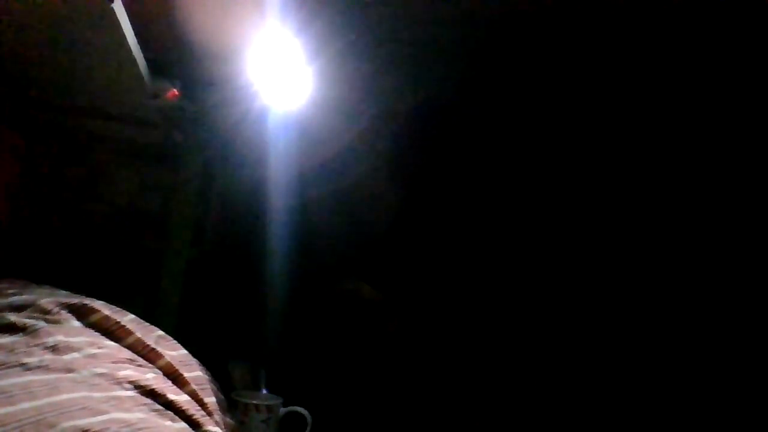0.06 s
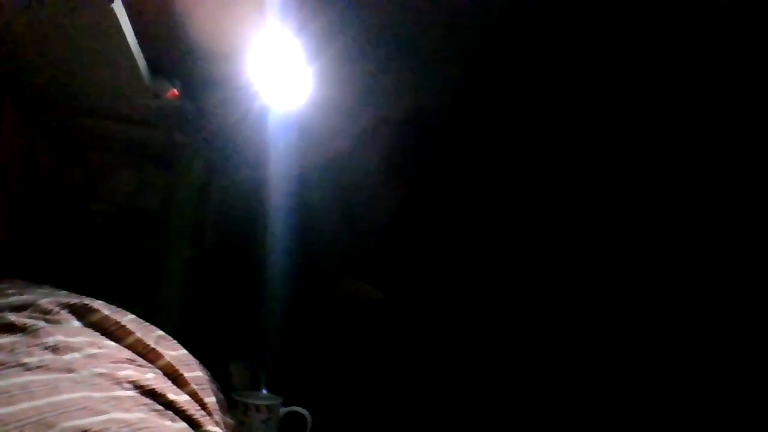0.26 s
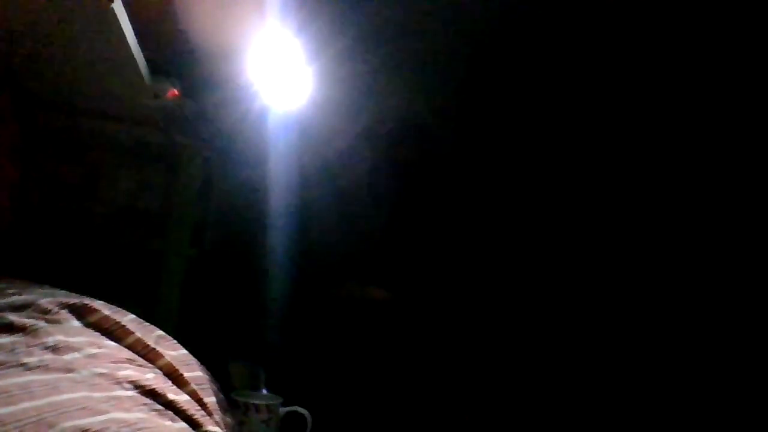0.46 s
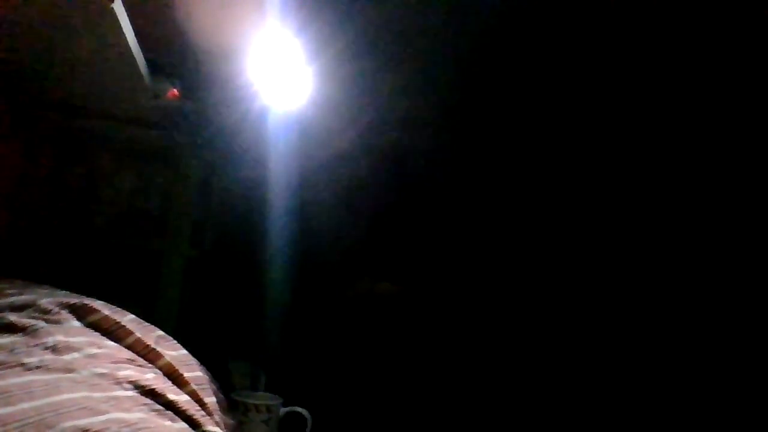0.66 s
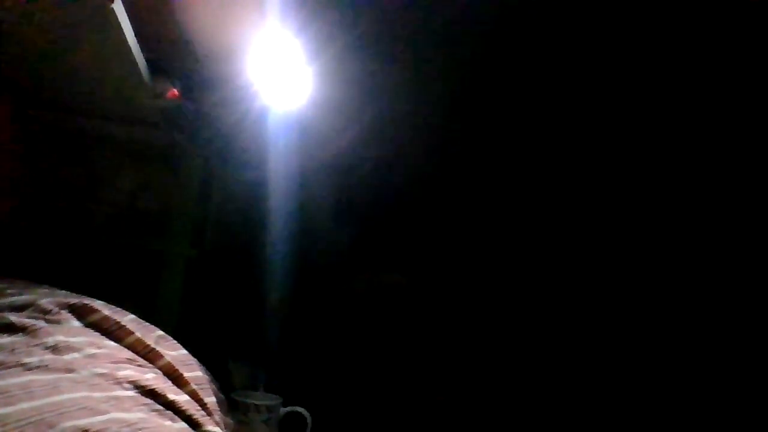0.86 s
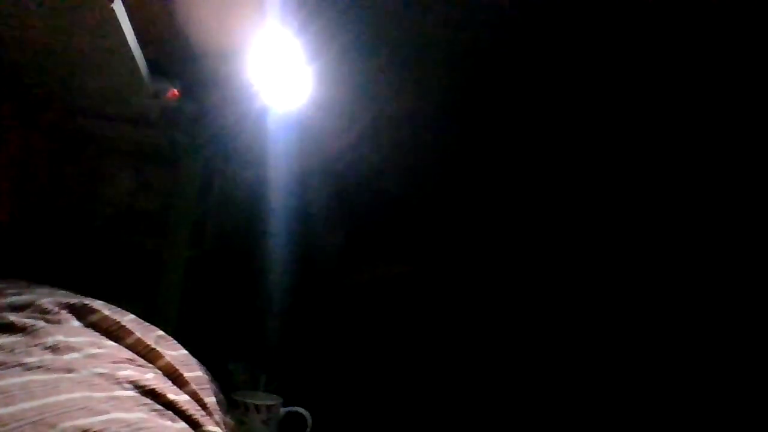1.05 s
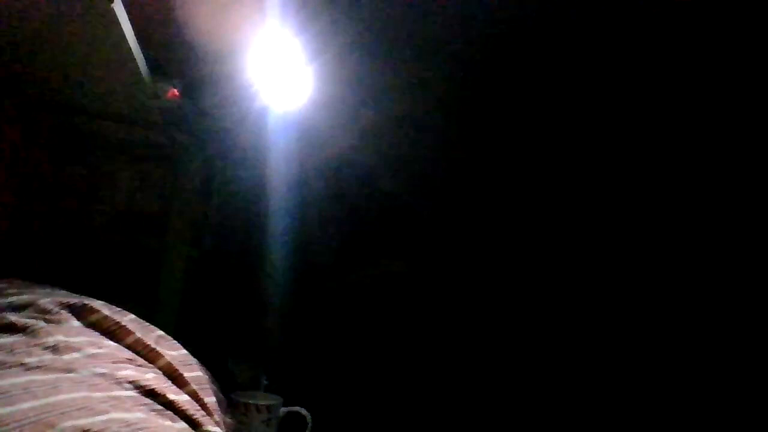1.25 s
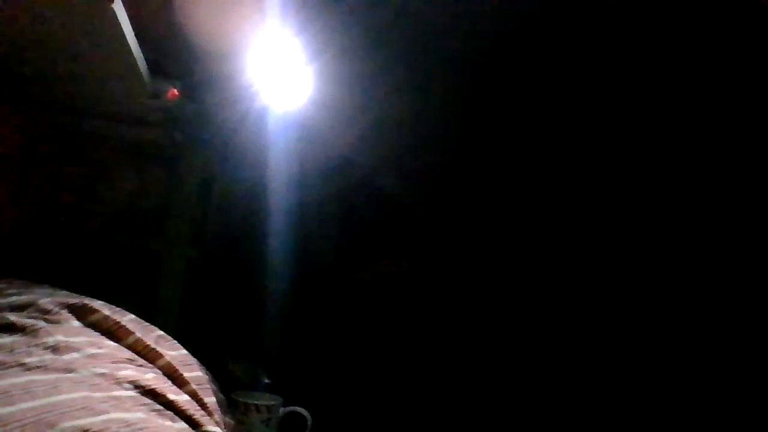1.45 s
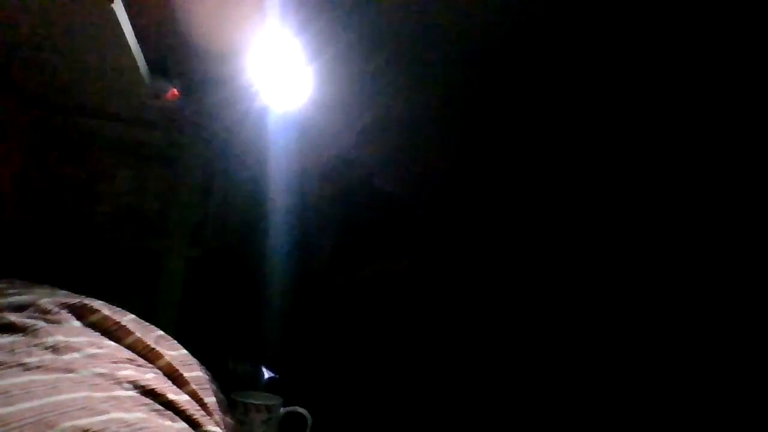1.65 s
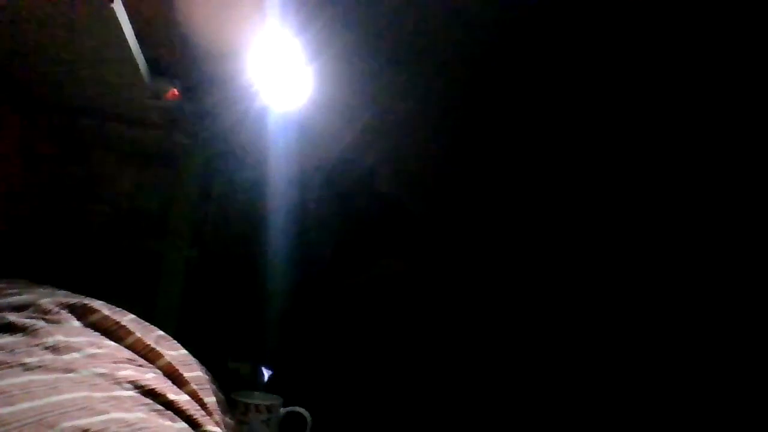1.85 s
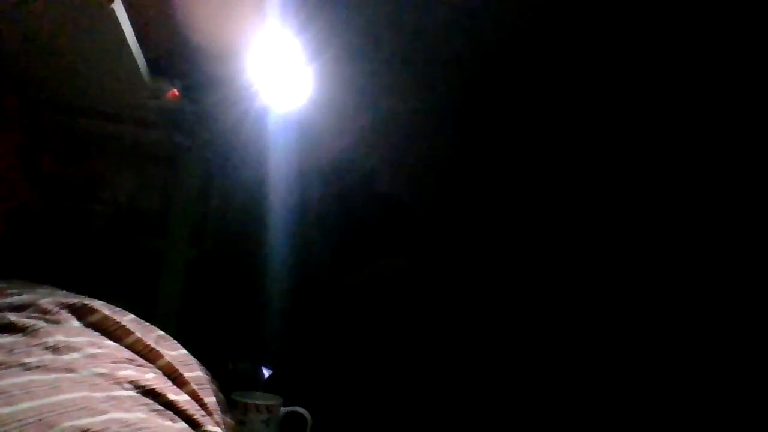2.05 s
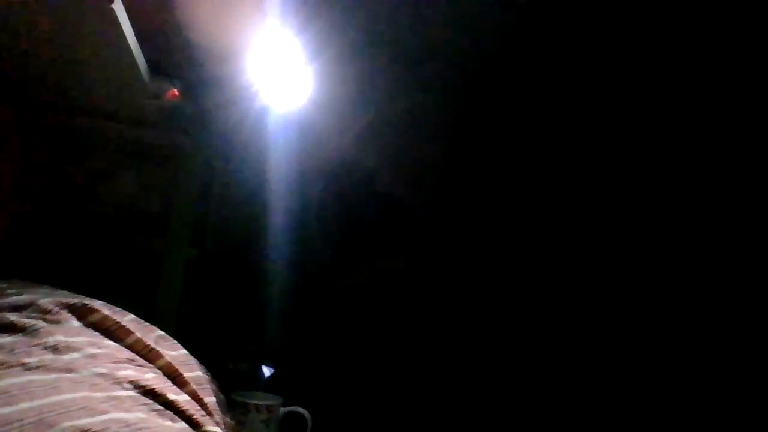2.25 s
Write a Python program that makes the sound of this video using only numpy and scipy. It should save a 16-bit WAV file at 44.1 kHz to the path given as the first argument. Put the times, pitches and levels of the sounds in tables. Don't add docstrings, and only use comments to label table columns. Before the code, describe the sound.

Something wooden is knocked about indoors, one hard crack first, then deep thuds and light latch-like clatter, fading to quiet; fabric rustles and low rumble come from a closely held stereo microphone.

```python
import sys
import numpy as np
from scipy import signal
from scipy.fft import rfft, irfft
from scipy.io import wavfile
from scipy.ndimage import uniform_filter1d

SR = 44100
rng = np.random.default_rng(int(sys.argv[2]) if len(sys.argv) > 2 else 0)


def dump_mix(stems):
    frames = np.atleast_2d(stems).T
    limited = np.clip(frames, -1, 1)
    pcm = np.round(limited * 32767).astype(np.int16)
    wavfile.write(sys.argv[1], SR, pcm)


def boost_factor(decibels):
    exponent = np.asarray(decibels, float) / 20
    return 10 ** exponent


N = 99225


def evened(x):
    return x / np.sqrt(np.mean(x ** 2) + 1e-20)


def read(points, hz):
    f, value = np.transpose(points)
    return np.interp(np.log(hz + 1), np.log(f + 1), value)


def along(curve):
    return boost_factor(np.interp(np.arange(N) / SR, *np.transpose(curve)))


def coloured(x, points):
    hz = np.fft.rfftfreq(len(x), 1 / SR)
    inside = (hz >= points[0][0]) & (hz <= points[-1][0])
    return evened(irfft(rfft(x) * boost_factor(read(points, hz)) * inside, len(x)))


def contact(t, length, rise_s, let_go_s):
    return np.clip(t / rise_s, 0, 1) * np.exp(-np.maximum(t - length, 0) / let_go_s)


def octave_bell(hz, centre, reach):
    return -6 * ((np.log2(hz / 1000) - centre) / reach) ** 2


def handling():
    # time_s, level_db
    effort = [(0, -29.5), (.28, -25.5), (.45, -25), (.55, -27.5), (.69, -35), (.9, -30), (1.0, -31),
              (1.3, -31), (1.43, -24), (1.6, -28.5), (1.72, -21), (1.82, -30), (2.05, -29.5), (2.25, -41)]
    # frequency_hz, density_db
    rumble_colour = [(6, -7), (15, 7.5), (30, -9.5), (58, -3.5), (80, -26), (110, -29), (160, -74)]
    # frequency_hz, density_db
    air_colour = [(60, 23.5), (100, 16), (200, 7.5), (400, -3.5), (1500, -4.5), (4000, -23.5), (16000, -45)]
    lumps = evened(uniform_filter1d(rng.standard_normal(N), size=1500))
    low = coloured(rng.standard_normal(N) * boost_factor(3.2 * lumps), rumble_colour)
    air = coloured(rng.standard_normal(N), air_colour)
    return along(effort) * low + boost_factor(-41.5) * air


def cloth():
    # time_s, level_db
    rustle = [(0, -29), (.09, -32.5), (.2, -29.5), (.28, -43.5), (.36, -33.5), (.46, -37), (.58, -29.5),
              (.74, -34), (.86, -36), (.9, -42.5), (1.12, -44), (1.18, -42.5), (1.27, -45), (1.42, -40.5),
              (1.6, -47), (1.75, -38), (2.08, -41.5), (2.25, -42.5)]
    # start_s, level_db, length_s
    brisk_rubs = [
        (0.136, -46, 0.02),
        (0.361, -35, 0.064),
        (0.645, -29.5, 0.06),
        (1.28, -33, 0.087),
        (1.428, -38.5, 0.11),
        (1.625, -31.5, 0.056),
        (1.871, -24.5, 0.078),
        (2.152, -42, 0.028),
    ]
    # frequency_hz, density_db
    cloth_colour = [(150, -14), (300, -1.5), (800, -6), (2000, -2.5), (5000, -4.5), (9000, -6),
                    (14500, -0.5), (16500, 6)]
    t = np.arange(N) / SR
    flicker = evened(uniform_filter1d(rng.standard_normal(N), size=300))
    grains = rng.standard_normal(N) * boost_factor(0.5 * rng.exponential(1, N) + 0.66 * flicker)
    hiss = rng.standard_normal(N) * boost_factor(1.2 * flicker)
    bright = coloured(hiss, [(1500, -7), (6000, -17), (13000, -10.5), (16500, -2.0)])
    rubs = sum(boost_factor(level_db) * contact(t - s, length, 0.023, 0.0086) for s, level_db, length in brisk_rubs)
    return boost_factor(1.0) * along(rustle) * coloured(grains, cloth_colour) + rubs * bright


def room(x):
    # frequency_hz, t60_s
    room_decay = [(150, 0.31), (1000, 0.28), (4000, 0.25), (12000, 0.21)]
    taps = np.zeros(SR // 2)
    at = np.arange(160, len(taps) - 20, 20)
    taps[at + rng.integers(0, 20, at.shape)] = rng.choice([-1., 1.], at.shape)
    hz, t, z = signal.stft(taps, SR, nperseg=256)
    decay = boost_factor(-60 * t / read(room_decay, hz)[:, None])
    tail = signal.istft(z * decay, SR, nperseg=256)[1]
    return signal.fftconvolve(x, tail / np.linalg.norm(tail))[:N]


def strikes(rows, modes, reach, crack_reach, rise, let_go_s, grain_db, low_hz, push):
    detune, uneven_db = .015, 1.5
    longest_ring_s = .15
    size = 16384
    t, hz = np.arange(size) / SR, np.fft.rfftfreq(size, 1 / SR) + 1
    out = np.zeros(N + size)
    f, mode_db, t60 = np.array(modes).T[:, :, None]
    highpass = signal.butter(4, low_hz, "high", fs=SR, output="sos")
    for s, level_db, length, centre, crack_db in rows:
        shift, uneven = rng.standard_normal((2, len(modes), 1))
        decay = np.exp(-np.log(1000) * t / np.clip(t60, .02, longest_ring_s))
        onset = 1 - np.exp(-2 * f * t)
        rings = rfft(decay * onset * np.sin(2 * np.pi * f * (1 + detune * shift) * t))

        grains = np.repeat(np.minimum(rng.exponential(1, size // 32), 2), 32)
        shape = contact(t, length, rise * length, let_go_s) * boost_factor(grain_db * grains)
        force = rfft(rng.standard_normal(size) * shape) + push

        free = np.linalg.norm(rings, axis=1, keepdims=True)
        driven = np.linalg.norm(rings * free / free * force, axis=1, keepdims=True)
        levels = boost_factor(mode_db + uneven_db * uneven + octave_bell(f, centre, reach))
        body = (rings * free / driven * levels).sum(0)
        ring = irfft(force * body)
        colour = boost_factor(octave_bell(hz, centre, crack_reach))
        crack = irfft(rfft(rng.standard_normal(size)) * colour) * shape

        head = slice(0, int((length + .01) * SR))
        sound = ring / ring[head].std() + boost_factor(crack_db) * crack / crack[head].std()
        at = round(s * SR)
        out[at:at + size] += boost_factor(level_db) * signal.sosfilt(highpass, sound)
    return out[:N]


def furniture_thumps():
    thump_events = [(.165, -36.5, 0.042, -1, -7), (.483, -34.5, 0.03, 3, 19),
                    (.635, -33.5, 0.035, -4, -6.5), (.767, -33, 0.019, -1.37, -5),
                    (.9, -39, 0.19, -3.5, -8.5), (1.06, -54.5, 0.17, -0.5, -28),
                    (1.125, -38.5, 0.037, -2.5, -32), (1.15, -41.5, 0.15, -2.5, -30),
                    (1.322, -23.5, 0.017, -0.66, -1.5), (1.345, -23, 0.0051, -1.3, -2.5),
                    (1.376, -36.5, 0.015, -0.5, 2.5), (1.44, -35.5, 0.015, -2.2, 0.5),
                    (1.595, -37, 0.1, -1.52, -16), (1.662, -34.5, 0.022, -0.6, 1.5),
                    (1.7, -30.5, 0.01, -3, -2.5), (1.765, -38, 0.028, -1.16, 0),
                    (1.828, -35, 0.014, -1, -11), (1.87, -40, 0.15, -2, -40)]
    # frequency_hz, level_db, t60_s
    frame_modes = [(124, 0, 0.074), (158, -2.5, 0.049), (223, 3, 0.054), (255, -2.5, 0.026),
                   (367, -4.5, 0.04), (469.5, -10, 0.083), (536, -33.5, 0.048), (718.3, -11, 0.1)]
    return strikes(thump_events, frame_modes, reach=0.45, crack_reach=1.8, rise=0.26, let_go_s=0.0094,
                   grain_db=-7.0, low_hz=70.6, push=18.0)


def single_mode_blows():
    # start_s, peak_db, pitch_hz, swell_s
    blow_events = [(.133, -27.5, 3530, 0.0048), (.14, -24, 944, 0.008), (0.159, -27.5, 120, 0.0092),
                   (.77, -33.5, 447, 0.0063), (1.16, -25.5, 60.5, 0.016), (1.42, -24, 61.3, 0.018),
                   (0.4792, -10.5, 1040, .003), (.484, -13, 2770, .003), (.488, -17, 1760, 0.0067),
                   (.494, -12.5, 894, 0.0034), (.508, -27, 995, 0.0047), (0.506, -27, 216, 0.0065),
                   (.535, -20.5, 936, 0.0044), (0.662, -25, 66.5, 0.014), (0.767, -19.5, 255, 0.0042),
                   (.81, -32.5, 134, 0.0078), (1.118, -20, 165.4, 0.0068), (1.22, -31.5, 188, 0.024),
                   (1.322, -8.5, 170, 0.0026), (1.323, -18, 320, 0.0085), (1.327, -17, 2930, 0.0014),
                   (1.326, -21.5, 4900, 0.0012), (1.18, -42, 362, 0.054), (1.333, -11.5, 474, 0.0051),
                   (1.346, -16, 215, 0.0048), (1.374, -12, 160, 0.0036), (1.388, -14.5, 134, 0.0074),
                   (1.449, -26, 488, 0.0049), (1.641, -17.5, 2156, .003), (1.667, -4.5, 161, 0.0028),
                   (1.667, -24, 2110, 0.0027), (1.674, -22, 488, 0.0058), (1.676, -24, 363, 0.0061),
                   (1.686, -16.5, 132.4, 0.0088), (1.705, -20.5, 84, 0.0091), (1.711, -26.5, 208, 0.0085),
                   (1.824, -24.5, 180, 0.0046), (1.829, -12.5, 2955, 0.0019), (1.835, -19, 2885, 0.0041),
                   (1.849, -27, 2950, 0.0028), (1.873, -21, 3000, 0.0055), (1.913, -19, 1335, 0.003),
                   (1.9201, -9, 2920, 0.0022), (1.921, -13, 2040, 0.0051), (1.971, -16.5, 4970, 0.0012),
                   (1.975, -16, 4670, 0.0026), (1.997, -22.5, 1380, 0.0025)]
    t, out = np.arange(8192) / SR, np.zeros(N + 8192)
    for s, peak_db, hz, swell in blow_events:
        u, at = t / swell, round(s * SR)
        sag = 0.011 * np.minimum(u, 10) / (1 + hz / 297)
        swelling = u * np.exp(1 - u)
        out[at:at + len(t)] += boost_factor(peak_db) * swelling * np.sin(2 * np.pi * hz * t * (1 - sag))
    return out[:N]


def latch_clatter():
    click_events = [(1.439, -40, 0.0044, -0.08, 10), (1.585, -49.5, 0.006, 0.2, 7),
                    (1.636, -28.5, 0.014, 0.97, 4), (1.64, -37, 0.037, 3.5, 7.5),
                    (1.666, -34, 0.021, 0.03, 3), (1.712, -45, 0.0051, 0.5, 7.5),
                    (1.757, -35, 0.0079, 1.5, 6), (1.79, -50, 0.03, 12, -19), (1.823, -30, 0.017, 1.5, 1.5),
                    (1.829, -28.5, 0.004, 1.2, 3), (1.835, -31, 0.0081, 0, -6),
                    (1.862, -34.5, 0.042, 1.5, 2.5), (1.88, -38.5, 0.02, 7.5, 27),
                    (1.9155, -23.5, 0.0042, 1.5, 5), (1.9205, -22.5, 0.0074, 1, 3.5),
                    (1.94, -36, 0.031, 1.1, 6.5), (1.97, -33, 0.021, 1.5, 5.5),
                    (1.99, -36, 0.022, 1.5, 3.5)]
    # frequency_hz, level_db, t60_s
    latch_modes = [(864, 6, 0.042), (1375, 3, 0.039), (2130, 2.5, 0.043), (2420, -4, 0.029),
                   (2860, -1, 0.017), (2945, -1, 0.018), (3460, -13, 0.017), (4330, -2, 0.051),
                   (4626, 11.5, 0.014), (5420, -8.5, 0.026), (6620, -6, 0.02)]
    return strikes(click_events, latch_modes, reach=0.53, crack_reach=1.43, rise=0.044, let_go_s=.012,
                   grain_db=1.0, low_hz=387, push=18)


def wooden_knocks():
    # start_s, level_db, contact_s, colour_centre_octaves (re 1 kHz), crack_db
    knock_events = [
        (.097, -42.5, 0.036, 2.5, 7.5),
        (.128, -28.5, 0.034, 2.5, 1.5),
        (.205, -36.5, 0.0057, -1.5, 0.5),
        (.385, -36, 0.009, 0.5, 2),
        (.479, -14, 0.011, 1, 4),
        (.6, -38, 0.0041, 20, -8),
        (.917, -49.5, 0.0034, 2.5, 7.5),
        (.955, -53.5, 0.012, 0.06, 16.5),
        (1.322, -26, 0.0023, 0.9, 0.5),
        (2.2, -42.5, 0.02, -2, 4.5),
    ]
    # frequency_hz, level_db, t60_s
    wood_modes = [(614, 4.5, 0.046), (752, -11, 0.2), (886, 7, 0.047), (939, -4.5, 0.19),
                  (1080, -2.5, 0.11), (1790, -11, 0.081), (2078, 4.5, 0.03), (2630, 5.5, 0.036),
                  (2890, 6.5, 0.014), (3653, 1, 0.026), (4435, 2, 0.018)]
    wood = strikes(knock_events, wood_modes, reach=2.45, crack_reach=1.87, rise=0.21, let_go_s=0.019,
                   grain_db=1.5, low_hz=440, push=0)
    return signal.lfilter(*signal.iirnotch(1450, 5, SR), wood)


def two_ports(field):
    # frequency_hz, left_lead_rad
    port_lead = [(0, 0), (250, 0), (600, .03), (1100, .1), (3500, .34), (6800, .8), (12100, 1.5),
                 (16000, 2.1)]
    z, hz = rfft(field), np.fft.rfftfreq(N, 1 / SR)
    turn = np.exp(.5j * np.interp(hz, *np.transpose(port_lead)))
    taps = rng.standard_normal(2000) * np.exp(-np.arange(2000) / 500)
    treble = boost_factor(-9) / (1 + (5000 / (hz + 1)) ** 4)
    scatter = rfft(taps / np.linalg.norm(taps), N) * treble
    return irfft([z * (turn + scatter), z * (1 / turn - scatter)], N)


def scene():
    background = handling() + cloth()
    thumps, clean = furniture_thumps(), single_mode_blows()
    latch, wood = latch_clatter(), wooden_knocks()
    direct = thumps + clean + latch + wood
    reverberant = boost_factor(-8.0) * room(thumps) + boost_factor(-12.5) * room(clean)
    reverberant += boost_factor(-8) * room(latch) + boost_factor(-9) * room(wood)
    return two_ports(background + direct + reverberant)


def band_limit(x):
    return signal.sosfilt(signal.butter(12, 16340, fs=SR, output="sos"), x)


def record(dry):
    edge = signal.firwin(801, 15900, window=("kaiser", 8), fs=SR)
    mix = np.clip(signal.oaconvolve(dry, edge[None], "same"), -1, 1)
    return band_limit(mix)


dry = scene()
out = record(dry)
dump_mix(out)
```